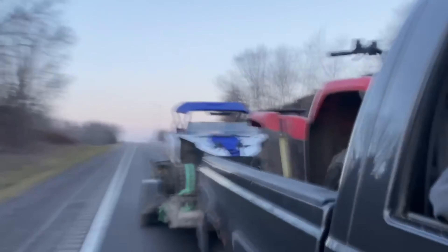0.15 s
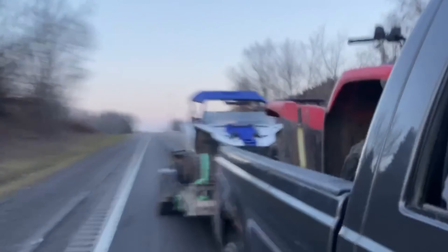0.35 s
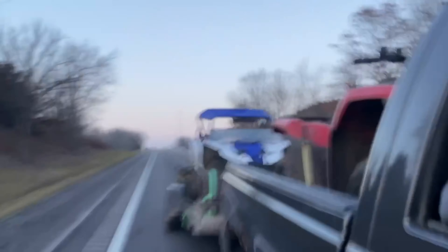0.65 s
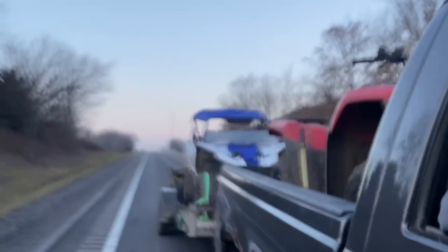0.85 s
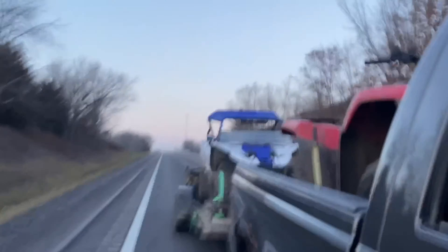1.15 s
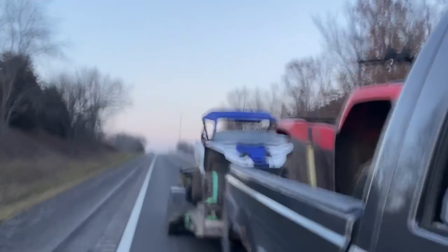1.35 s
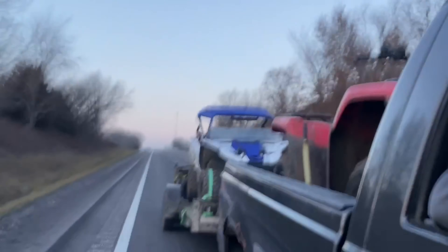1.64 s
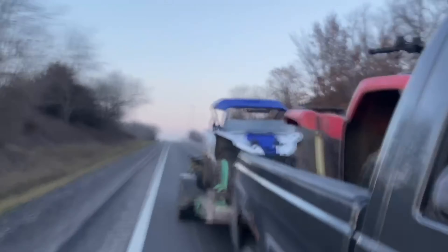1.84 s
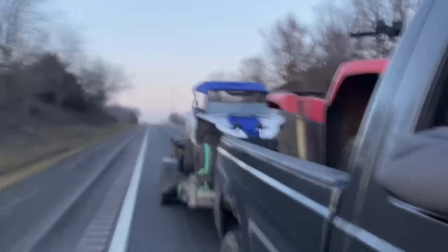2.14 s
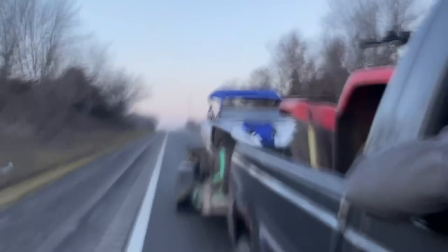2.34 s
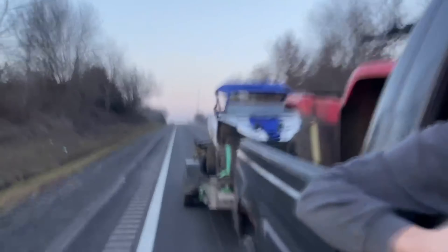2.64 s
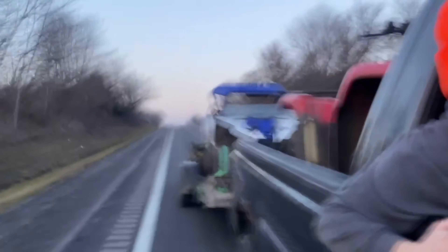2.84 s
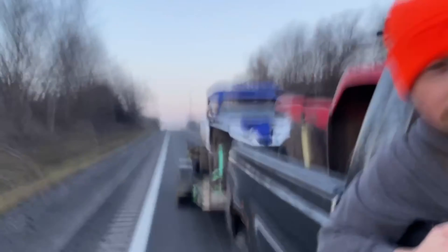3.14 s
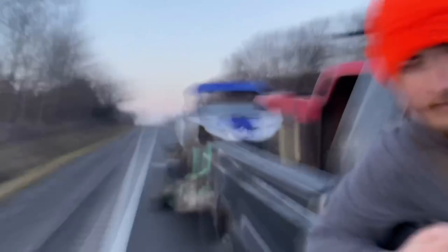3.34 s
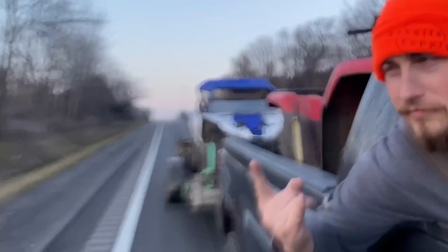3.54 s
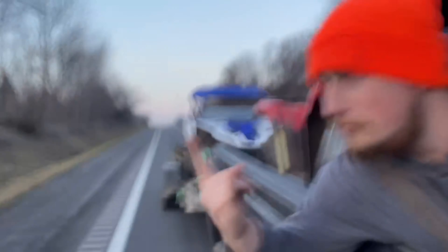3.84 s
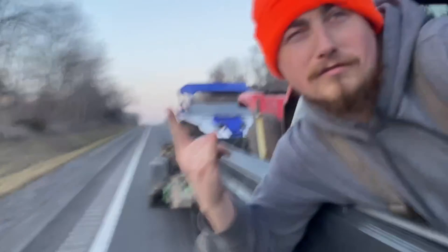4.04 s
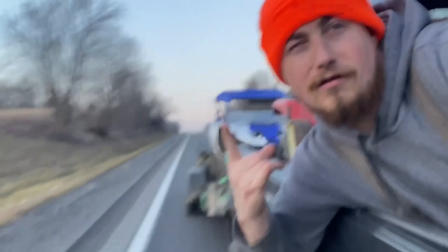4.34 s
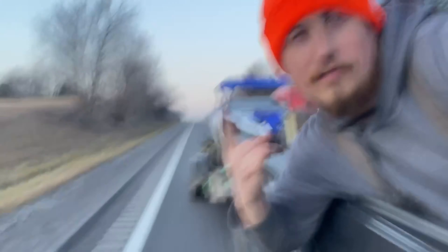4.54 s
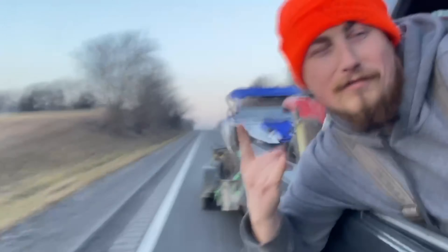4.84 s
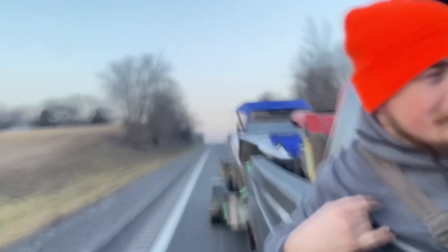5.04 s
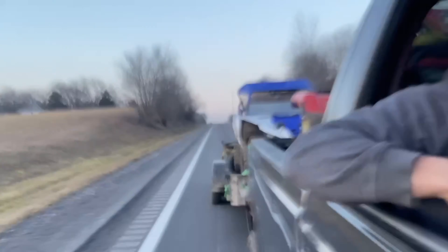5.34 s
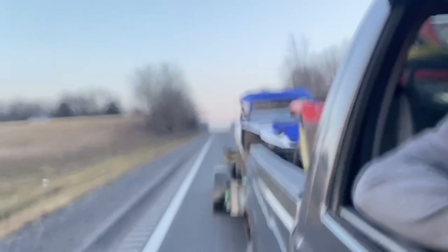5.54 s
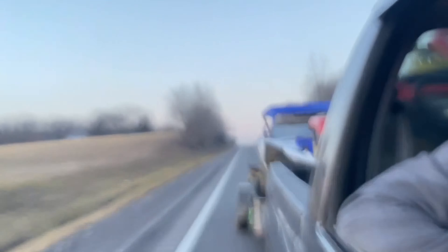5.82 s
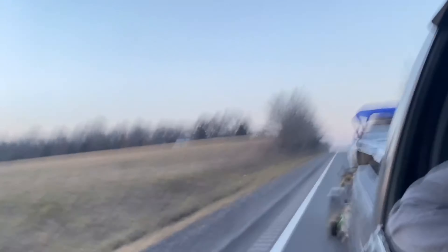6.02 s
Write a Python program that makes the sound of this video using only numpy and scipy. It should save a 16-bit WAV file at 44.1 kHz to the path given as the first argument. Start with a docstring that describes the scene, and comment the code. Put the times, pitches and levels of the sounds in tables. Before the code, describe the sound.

Wind buffets a phone microphone held out of the window of a truck at highway speed. A low, uneven throb and a broad roar run under quick tearing, fizzing gusts, with a steady hiss of tyres on the road beneath. Small sharp ticks dot the gusts, mostly in the second half. Near the end the microphone moves into shelter, so the wind turns dull and the road noise falls away.

```python
"""Wind buffets a phone held out of the open window of a truck at highway speed. Vortices shed from the
hand and phone give a low throb; turbulence tears and fizzes in bursts at the two microphone ports, and
sharp ticks dot the gusts, thickest in the second half. Underneath lie a broad wind roar and tyre hiss.
At the end the phone is pulled into shelter: the wind turns dull and the road falls away."""
import sys
import numpy as np
from scipy import signal
from scipy.fft import rfft, irfft, next_fast_len
from scipy.io import wavfile
from scipy.ndimage import uniform_filter1d, map_coordinates

SR = 44100
rng = np.random.default_rng(int(sys.argv[2]) if len(sys.argv) > 2 else 0)


def wav_record(signal):
    """Record a signal, one row per channel, as 16-bit PCM in the file named by sys.argv[1]."""
    frames = np.transpose(np.atleast_2d(signal))
    bounded = np.clip(frames, -1, 1)
    # unit amplitude maps onto the largest positive 16-bit level
    quanta = np.round(bounded * 32767).astype(np.int16)
    wavfile.write(sys.argv[1], SR, quanta)


N = 272307

# Pitch and level of the vortex throb: t/s, shedding f/Hz, level/dB
VORTICES = [(0, 72.3, 0), (.07, 73.7, -21), (.13, 65, -10), (.2, 75, -21), (.23, 79, -12), (.27, 71, -28),
            (.31, 65.7, -17), (.39, 101.9, -19), (.45, 92.5, -28), (.49, 80, -15), (.64, 108.4, -34),
            (.74, 75.2, -22), (.88, 80.5, -23), (.95, 60.3, -11.5), (1.03, 80.2, -20), (1.05, 84.4, -16),
            (1.12, 66.5, -23), (1.16, 69.9, -5.5), (1.19, 77.7, -22), (1.28, 95.9, -14.5),
            (1.37, 89.8, -36), (1.52, 115.6, -17), (1.57, 85, -14.5), (1.62, 78.3, -40), (1.65, 82.5, -12),
            (1.72, 104.1, -17), (1.77, 74.8, -20), (1.85, 83.05, -13), (1.9, 105.5, -19.5),
            (1.95, 87.6, -24), (2.0, 90.9, -9), (2.04, 100.4, -16.5), (2.07, 106.3, -11), (2.11, 88.1, -27),
            (2.18, 113.1, -23), (2.2, 115.8, -13.5), (2.29, 77.3, -20), (2.45, 87.1, -28.5),
            (2.63, 66.6, -23), (2.67, 79.7, -31), (2.75, 107.4, -22), (2.92, 103.5, -36.5),
            (2.97, 131, -18), (3.01, 106.5, -32), (3.08, 60.9, -14), (3.13, 82.5, -25), (3.2, 88.1, -17),
            (3.3, 95.55, -33), (3.38, 140, -25), (3.44, 131.3, -23.5), (3.51, 119, -25), (3.58, 107, -17),
            (3.63, 99.55, -31), (3.67, 124.4, -16.5), (3.7, 113, -15), (3.73, 105, -28), (3.77, 99.1, -12),
            (3.79, 107.3, -28), (3.81, 125, -8.5), (3.835, 126.2, -17), (3.86, 132.3, -6),
            (3.92, 124, -15.5), (3.95, 124.9, -15.5), (3.98, 104.1, -29), (4.0, 135, -10), (4.02, 108, -14),
            (4.05, 79.84, -26), (4.25, 60, -22), (4.41, 72, -29), (4.45, 75, -28.5), (4.62, 78, -23),
            (4.75, 124.9, -27), (4.92, 118.2, -27), (5.05, 99.8, -22.5), (5.33, 72, -30), (5.55, 77.9, -25),
            (5.63, 64.2, -23), (5.72, 75.7, -28), (5.77, 69, -32), (5.88, 72.5, -40), (6.17, 89.4, -28)]
# Gust faders: t/s, fizz level/dB, tearing level/dB (700-2500 Hz), roar level/dB (200-600 Hz)
GUSTS = [(0.02, -35, -18, -18.5), (0.11, -31.5, -22.5, -20.5), (0.16, -40.5, -33, -19),
         (0.19, -37, -26, -21), (0.23, -37.5, -28, -22), (0.34, -34, -18.5, -20), (0.38, -38, -25, -20.5),
         (0.43, -32.5, -19.5, -21), (0.5, -36.5, -23.5, -19), (0.57, -38.5, -31, -23.5),
         (0.63, -37, -19.5, -25), (0.65, -39.5, -34, -24.5), (0.69, -33.5, -18, -20), (0.73, -41, -30, -23),
         (0.75, -33, -14, -21.5), (0.8, -39, -30, -20.5), (0.86, -34.5, -15.5, -18),
         (0.91, -36.5, -27.5, -20), (0.95, -37, -29.5, -22.5), (0.98, -30, -17, -18.5),
         (1.02, -35, -24.5, -21.5), (1.05, -31, -19, -18), (1.12, -35.5, -26, -24), (1.16, -34, -22, -19),
         (1.21, -38, -28.5, -25), (1.245, -37, -22.5, -15.5), (1.265, -34.5, -13.5, -30),
         (1.28, -36, -22.5, -21), (1.31, -35.5, -23, -24.5), (1.39, -34, -22, -19.5),
         (1.46, -34.5, -33, -22.5), (1.49, -35, -24.5, -20.5), (1.53, -29, -20, -24),
         (1.55, -37.5, -31.5, -21.5), (1.6, -32, -23, -22), (1.69, -33, -22.5, -21),
         (1.73, -34, -22, -21.5), (1.85, -34.5, -24, -21), (1.88, -29.5, -17.5, -22), (1.96, -37, -26, -19),
         (2.02, -30.5, -18, -22), (2.1, -39, -28, -24), (2.22, -31, -19, -22.5), (2.25, -35, -21, -25),
         (2.3, -28.5, -21.5, -22), (2.34, -40.5, -35, -25.5), (2.38, -30.5, -19.5, -22),
         (2.4, -42, -33, -25), (2.48, -26.5, -18.5, -25.5), (2.55, -33, -26.5, -22),
         (2.58, -29, -17.5, -20), (2.64, -37, -26, -23), (2.68, -28.5, -14.5, -22.5), (2.73, -35, -23, -22),
         (2.88, -29, -19.5, -21.5), (3.05, -33.5, -22, -23), (3.1, -38, -26.5, -22.5),
         (3.12, -36.5, -22.5, -22.5), (3.22, -30, -21, -18.5), (3.27, -33, -24, -25.5),
         (3.31, -27.5, -21, -22), (3.39, -34.5, -24.5, -19.5), (3.42, -28, -22.5, -26),
         (3.48, -31.5, -20, -19.5), (3.51, -46, -35.5, -29), (3.55, -31, -19, -24), (3.57, -35, -30.5, -23),
         (3.6, -33.5, -23, -20), (3.67, -36.5, -34, -23), (3.69, -37.5, -23, -21),
         (3.82, -27.5, -21.5, -23), (3.88, -37, -25.5, -28), (3.91, -33, -24, -22.5),
         (3.99, -27.5, -21.5, -18.5), (4.04, -38, -25.5, -24), (4.13, -27, -17, -23.5),
         (4.21, -37.5, -25.5, -20), (4.23, -23.5, -24, -24), (4.25, -43, -31.5, -25.5),
         (4.27, -29, -24, -22.5), (4.4, -33.5, -22, -24.5), (4.44, -31, -19.5, -24),
         (4.49, -27, -21.5, -23), (4.52, -33, -22, -26), (4.56, -33, -22, -24), (4.62, -28.5, -23, -23.5),
         (4.68, -35, -24, -22), (4.7, -36, -28, -26), (4.75, -25.5, -18, -25), (4.79, -33, -22.5, -22),
         (4.86, -39, -26.5, -23.5), (4.91, -39.5, -25, -24.5), (4.95, -28.5, -23.5, -29.5),
         (4.98, -39, -23, -22.5), (5.08, -33, -20.5, -24), (5.12, -39, -25.5, -22),
         (5.16, -28.5, -21.5, -27.5), (5.21, -38.5, -27, -25), (5.31, -33.5, -20.5, -25),
         (5.35, -33.5, -31, -22.5), (5.4, -33, -22.5, -24), (5.44, -31, -18, -23), (5.47, -29, -20, -22),
         (5.51, -28.5, -16.5, -21), (5.54, -31, -25.5, -18), (5.57, -23, -18.5, -27),
         (5.6, -31.5, -20.5, -20), (5.63, -25, -20.5, -21), (5.67, -40, -27, -25),
         (5.78, -35.5, -25, -21.5), (5.87, -49, -29.5, -29.5), (5.96, -50, -34.5, -25.5),
         (6.04, -55, -35.5, -28.5), (6.1, -54, -39, -30.5), (6.17, -61, -44, -34.5)]
# Hits of the strongest eddies: t/s, rough peak level/dB, fizz level against the tearing/dB
STRONG_EDDIES = [(0.028, -5, -14), (0.073, -5, -20), (0.107, -8, -22), (0.175, -16, -20), (0.216, -12, -23),
                 (0.26, -3, -21), (0.307, -15, -23), (0.347, -2, -23), (0.489, -11, -22), (0.543, -19, -20),
                 (0.607, -26, -20), (0.623, -10, -17), (0.661, -4, -14), (0.691, -13, -20),
                 (0.708, -2.5, -18), (0.743, -9, -20), (0.815, -15, -20), (0.899, -3, -18),
                 (0.928, -12, -22), (0.967, -22, -24), (1.004, -10, -14), (1.041, -9.5, -13),
                 (1.159, -4, -20), (1.226, -13, -18), (1.261, -12, -8), (1.288, -12, -20),
                 (1.333, -15, -22), (1.347, -9, -20), (1.435, -14, -20), (1.495, -14, -20),
                 (1.518, -3, -20), (1.561, -8, -17), (1.599, -6, -12), (1.618, -3, -26), (1.703, -21, -20),
                 (1.72, -13, -10), (1.874, -8, -20), (1.907, -11, -18), (1.963, -9, -16), (2.116, -13, -18),
                 (2.143, -25, -18), (2.185, -10, -20), (2.343, -11, -22), (2.409, -11, -24),
                 (2.475, -12, -22), (2.562, -10, -18), (2.653, -16, -17), (2.749, -10, -20),
                 (2.995, -11, -20), (3.018, -22, -23), (3.035, -15, -22), (3.112, -10, -20),
                 (3.275, -10, -12), (3.31, -1, -10), (3.332, -16, -20), (3.391, -14, -16), (3.411, -7, -25),
                 (3.457, -15, -18), (3.54, -10, -16), (3.58, -7, -17), (3.637, -21, -20), (3.655, -19, -20),
                 (3.688, -7, -18), (3.728, -14, -22), (3.813, -13, -24), (3.857, -13, -15),
                 (3.899, -11, -6), (3.954, -9, -20), (4.013, -8, -20), (4.232, -13, -12), (4.266, -15, -20),
                 (4.296, -13, -23), (4.408, -19, -20), (4.484, -6, -21), (4.716, -6, -17),
                 (5.004, -14, -16), (5.158, -10, -20), (5.501, -19, -20), (5.56, -7, -22),
                 (5.695, -15, -22), (5.777, -19, -20), (5.927, -35, -20), (5.947, -26, -20),
                 (6.078, -24, -20), (6.156, -26, -20)]
# Midrange tone of the tearing: f/Hz, level/dB
TEAR_EQ = [(100, -63), (300, -2.5), (600, 2), (1000, 0.5), (2000, -6.5), (3000, -21), (4500, -24.5),
           (8000, -66)]
# Bright tone of the fizz: f/Hz, level/dB
FIZZ_EQ = [(1500, -18.5), (2500, 2), (3300, 0), (4300, -8.5), (6000, -8), (8000, -17), (9500, -29),
           (12000, -34.5), (15800, -70)]
# Tick cues: t/s, level/dB, left-right lean before widening/dB
TICK_CUES = [(0.6719, -46, 0.5), (1.04, -41, -1.0), (1.5968, -50, 0.0), (1.8487, -38, -0.5),
             (2.3012, -43, 1.5), (2.5636, -50, 1.0), (2.7097, -42, -1.0), (2.815, -42, 0.0),
             (3.1457, -46, -1.0), (3.1946, -42, 4.5), (3.2054, -43, 0.5), (3.2764, -46, -0.5),
             (3.2919, -42, 1.5), (3.3009, -37, -2.0), (3.3104, -40, -1.0), (3.3433, -43, 0.0),
             (3.3902, -40, 0.0), (3.4411, -50, 1.0), (3.481, -41, -0.5), (3.5518, -45, 0.0),
             (3.5653, -41, -0.5), (3.6365, -39, 0.5), (3.8107, -40, 0.5), (3.8596, -37, -4.5),
             (3.9085, -41, -0.5), (3.9938, -42, -3.5), (4.1265, -41, 0.5), (4.152, -41, 0.5),
             (4.1904, -44, 1.5), (4.2303, -36, 0.5), (4.2687, -42, 0.0), (4.2971, -46, -0.5),
             (4.3226, -40, 2.0), (4.3824, -38, -2.0), (4.4358, -43, 0.5), (4.4523, -42, 1.5),
             (4.6074, -48, 0.0), (4.6318, -51, 0.0), (4.7002, -47, -1.5), (4.7456, -42, 2.0),
             (4.9482, -41, -1.5), (4.9955, -44, 2.0), (5.0878, -41, 4.0), (5.1387, -51, -1.0),
             (5.1572, -43, 0.0), (5.3113, -46, 1.0), (5.437, -38, -4.0), (5.5009, -48, 0.0),
             (5.5333, -43, 0.0), (5.5648, -37, -0.5), (5.5714, -43, -0.5), (5.5857, -44, 2.0),
             (5.6246, -33, 1.5), (5.7364, -46, 0.5), (5.7508, -45, -0.5), (5.7778, -50, -1.0)]
# Fader of the spitting between ticks: t/s, level/dB
SPIT_FADER = [(0, -64), (.3, -65), (1.5, -62), (3, -60.5), (3.3, -54), (3.55, -57), (3.85, -56), (4.4, -60),
              (4.85, -80), (5.3, -59), (5.6, -53), (5.68, -66), (5.78, -61), (5.86, -82), (6.17, -100)]
# Crisp tone of ticks and spitting: f/Hz, level/dB
TICK_EQ = [(2000, -20), (4000, 0), (6000, 3), (9000, 2.5), (12000, -6), (15800, -13)]
# Bass-heavy tone of the wind roar: f/Hz, level/dB
ROAR_EQ = [(15, -47), (25, -31), (40, -5), (60, 0.5), (130, -5), (200, -6.5), (420, -12.5), (700, -16.5),
           (1500, -31.5), (4000, -80)]
# Tone of the tyres on the road: f/Hz, level/dB
TYRE_EQ = [(300, -16), (900, 3.5), (2000, -6), (3500, -20), (6000, -26.5), (8500, -34), (10000, -72)]
# Fader of the tyre hiss, dropping in shelter: t/s, level/dB
TYRE_FADER = [(0, -27.5), (1.2, -27.5), (2.5, -28), (3.5, -30), (4.5, -27.5), (5.65, -27.5), (5.9, -45),
              (6.17, -57)]
# Stereo width of the wind and road: f/Hz, left-right likeness (0-1), phase lead of the left/rad
STEREO_WIDTH = [(130, .72, -.1), (330, .3, -.7), (750, .18, 2.6), (1030, .46, 2.0), (2150, .44, -1.0),
                (3200, .2, 2.7), (4200, .5, 0), (5400, .63, -3), (6500, .67, 0), (8000, .25, -2.1),
                (9300, .75, 3.1), (11300, .9, 0), (13300, .85, 3.1), (15300, .72, 0)]
# Balance of the two channels: f/Hz, left-right level/dB
BALANCE = [(60, -2), (120, 0.5), (240, -1.5), (490, 1), (990, -0.5), (2000, -4), (4020, -3), (8110, -2.5)]


def vortex_throb(width_hz=30, steady=0.6, likeness=0.97, waver_hz=5, breakup_db=0.76):
    """Shed vortices: a wavering low tone in a narrow band of noise, nearly the same at both ports."""
    shedding_hz, level_db = curves(VORTICES)
    drift = filtered(rng.standard_normal((2, 2, N)), lambda hz: 1 / (1 + (2 * hz / width_hz) ** 2))
    phase = 2 * np.pi * np.cumsum(shedding_hz + waver_hz * wobble(45)[0]) / SR
    mid_noise, side_noise = unit(drift[:, 0] * np.cos(phase) + drift[:, 1] * np.sin(phase))
    mid = unit(steady * unit(np.sin(phase)) + (1 - steady) * mid_noise)
    spread = np.arccos(likeness) / 2
    ports = np.cos(spread) * mid + np.sin(spread) * side_noise * [[1], [-1]]
    return amp(level_db) * unit(amp(breakup_db * wobble(25)) * ports)


def turbulence(tear_db, fizz_db, tear_bursts, fizz_bursts, ceiling_db=6):
    """Eddies of several sizes pass the ports, swelling a gritty midrange tear and a bright fizz."""
    port_db = 1.3 * wobble(60, channels=2) + 2.44 * wobble(150, channels=2)
    port_db += 1.77 * wobble(330, channels=2)
    swell_db = 1.17 * wobble(90) + port_db
    limited_db = ceiling_db * np.tanh(swell_db / ceiling_db)
    eddies = unit(amp(np.where(swell_db > 0, limited_db, swell_db)))  # swells level off, lulls stay deep
    air = patchy_hiss() + 0.86 * crackle(per_second=450, spread_db=5.0)
    tear = coloured(air, TEAR_EQ, band_hz=(700, 2500)) * (amp(tear_db) * eddies + tear_bursts)
    fizz = coloured(air, FIZZ_EQ) * (amp(fizz_db) * (0.13 + 0.61 * eddies) + fizz_bursts)
    return tear + fizz


def eddy_bursts(rise_s=0.0028, length_s=0.0055, crest_db=12, pan_scatter_db=3):
    """Tear and fizz envelopes of the strongest eddies: short punches, each nearer one port."""
    envelopes = np.zeros((2, 2, N + SR))
    t = np.arange(SR // 8) / SR
    shape = (1 - np.exp(-(t / rise_s) ** 2)) * np.exp(-(t / length_s) ** 2)
    for start_s, peak_db, fizz_db in STRONG_EDDIES:
        gains = amp(peak_db - crest_db) * pan(pan_scatter_db * rng.standard_normal())
        swell = gains * shape / shape.max()
        start = round(start_s * SR)
        envelopes[..., start:start + len(t)] += [swell, amp(fizz_db) * swell]
    return envelopes[..., :N]


def ticks(spit_db, tear_bursts, widen=1.5, puff_db=-17, puff_s=0.004, burst_spit_db=-50):
    """Sharp treble clicks over a spitting sizzle that puffs up around each click and strong eddy."""
    def snap(hz):
        gain = amp(along(TICK_EQ, hz))
        return 2 * gain / np.mean(gain * (hz > 9000))  # the top end sets the click's level

    clicks = np.zeros((2, N))
    for start_s, level_db, lean_db in TICK_CUES:
        clicks[:, round(start_s * SR)] = amp(level_db) * pan(widen * lean_db)[:, 0]
    puff_shape = np.exp(-(np.arange(-2000, 2001) / SR / puff_s) ** 2)
    puffs = amp(puff_db) * signal.fftconvolve(clicks.mean(axis=0), puff_shape, "same")
    spit = crackle(per_second=160, spread_db=1.5)
    sizzle = 0.8 * amp(2.0 * wobble(90)) * rng.standard_normal((2, N))
    envelope = amp(spit_db) + puffs + amp(burst_spit_db) * tear_bursts
    return filtered(clicks, snap) + envelope * coloured(spit + sizzle, TICK_EQ)


def wind_roar(level_db):
    """The body of the wind: broad low noise, slightly lumpy at each port."""
    lumps = amp(0.56 * wobble(14, channels=2) + 1.68 * wobble(45, channels=2))
    return amp(level_db) * coloured(lumps * rng.standard_normal((2, N)), ROAR_EQ, band_hz=(200, 600))


def tyre_hiss():
    """Tyres on the road: an even bed that fills the lulls between gusts."""
    return amp(curves(TYRE_FADER)[0]) * coloured(patchy_hiss(), TYRE_EQ)


def stereo_image(pair):
    """Sets the width: left-right likeness, phase and balance vary with frequency."""
    f, likeness, lead = np.transpose(STEREO_WIDTH)
    link = lambda hz: np.interp(hz, f, likeness * np.exp(1j * lead))
    bleed = lambda hz: np.arcsin(np.abs(link(hz))) / 2
    turn = lambda hz: np.array([np.exp(1j * np.angle(link(hz))), np.ones(len(hz))])
    image = lambda hz: turn(hz) * pan(along(BALANCE, hz))
    direct = filtered(pair, lambda hz: np.cos(bleed(hz)) * image(hz))
    crossed = filtered(pair[::-1], lambda hz: np.sin(bleed(hz)) * image(hz))
    return direct + crossed


def crackle(per_second, spread_db):
    """Grit: sparse pressure spikes of uneven size at each port."""
    hit, size, sign = rng.random((3, 2, N))
    return unit((hit < per_second / SR) * amp(-spread_db * np.log(size + 0.016)) * np.sign(sign - .5))


def patchy_hiss(depth_db=3.0):
    """Hiss with patches of random gain, about 1 kHz by 15 ms, so that bands move on their own."""
    spectrum = signal.stft(rng.standard_normal((2, N)), nperseg=256)[2]
    patches = uniform_filter1d(rng.standard_normal(spectrum.shape), size=6, axis=1)
    patches = uniform_filter1d(patches, size=5, axis=2)
    return signal.istft(spectrum * amp(depth_db * unit(patches)), nperseg=256)[1][:, :N]


def wobble(rate, channels=1):
    """Smooth random modulation, rate knots a second."""
    coarse = np.arange(0, N + 16, 16)
    knots = rng.standard_normal((channels, N // 100))
    smooth = [map_coordinates(row, [coarse * rate / SR]) for row in knots]
    return np.array([np.interp(np.arange(N), coarse, row) for row in smooth])


def filtered(x, response):
    """x through a complex frequency response."""
    size = next_fast_len(N + 8192)
    return irfft(rfft(x, size) * response(np.fft.rfftfreq(size, 1 / SR)), size)[..., :N]


def coloured(x, eq, band_hz=(0, 20000)):
    """x through an EQ curve, at rms 1 within the band."""
    x = filtered(x, lambda hz: amp(along(eq, hz)))
    return x / np.std(filtered(x, lambda hz: (hz > band_hz[0]) & (hz < band_hz[1])))


def along(points, hz):
    """A curve's value at hz, on a log frequency axis."""
    f, values = np.transpose(points)
    return np.interp(np.log(hz + 1), np.log(f + 1), values)


def curves(rows):
    """Automation: one value per sample for each column after the time."""
    times, *columns = np.transpose(rows)
    return [np.interp(np.arange(N) / SR, times, column) for column in columns]


def pan(db):
    """Left and right gains, as two rows, for a lean of db to the left."""
    return amp(np.vstack([db, -db]) / 2)


def amp(db):
    """Gain of a dB value."""
    return 10 ** (np.asarray(db) / 20)


def unit(x):
    """x at rms 1."""
    return x / np.sqrt(np.mean(np.abs(x) ** 2) + 1e-20)


def scene():
    """The throb sits in the centre; gusts and road spread around it."""
    fizz_db, tear_db, roar_db = curves(GUSTS)
    tear_bursts, fizz_bursts = eddy_bursts()
    wind = wind_roar(roar_db) + turbulence(tear_db, fizz_db, tear_bursts, fizz_bursts)
    wind += ticks(curves(SPIT_FADER)[0], tear_bursts)
    return vortex_throb() + stereo_image(wind + tyre_hiss())


def record(dry, ceiling=.97, hardness=4, low_hz=36, top_hz=15830):
    """The microphones cut the deepest bass; loud peaks round off and nothing passes above top_hz."""
    trimmed = filtered(dry, lambda hz: (1j * hz / (low_hz + 1j * hz)) ** 2)
    rounded = trimmed / (1 + np.abs(trimmed / ceiling) ** hardness) ** (1 / hardness)
    return filtered(rounded, lambda hz: hz < top_hz)


dry = scene()
out = record(dry)
wav_record(out)
```